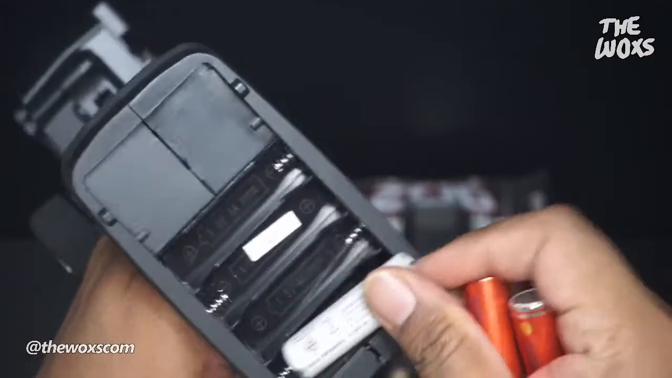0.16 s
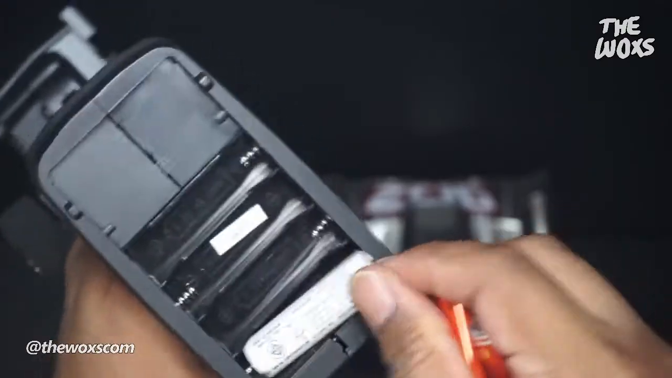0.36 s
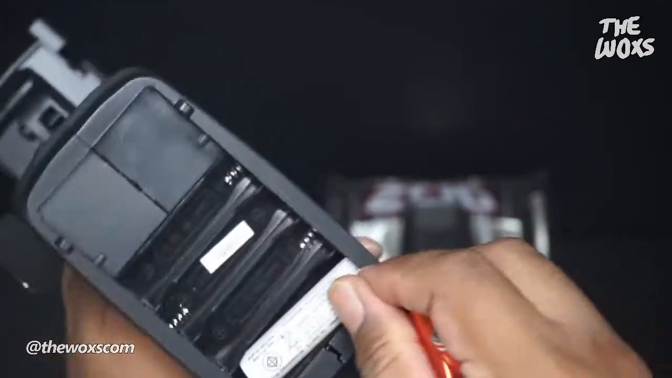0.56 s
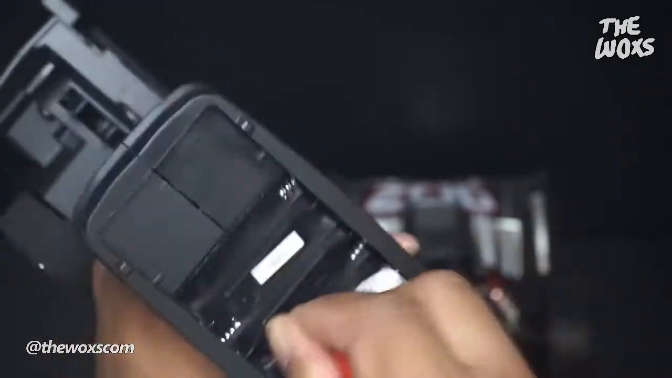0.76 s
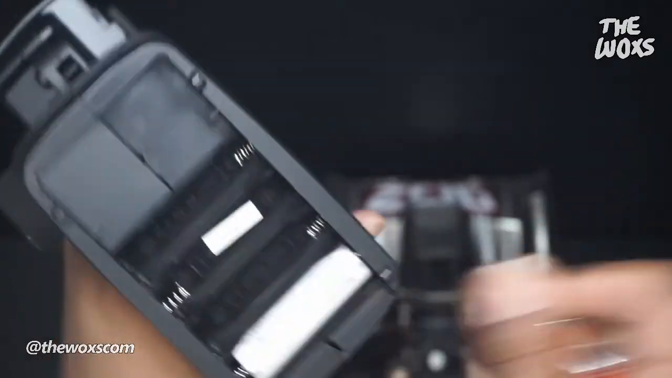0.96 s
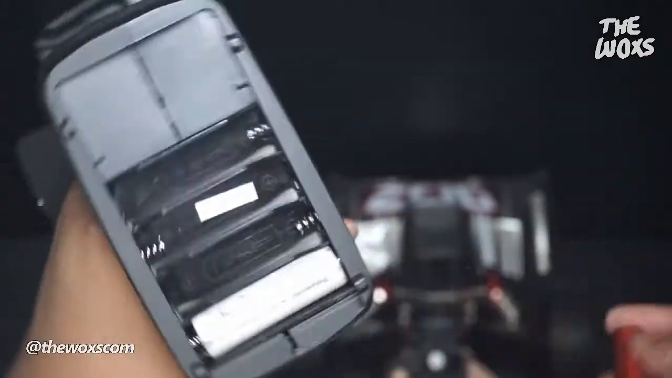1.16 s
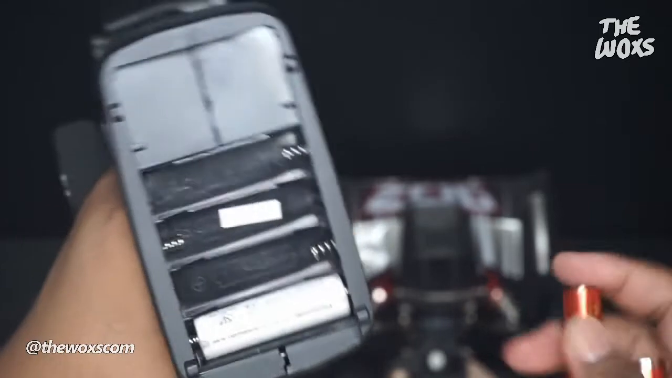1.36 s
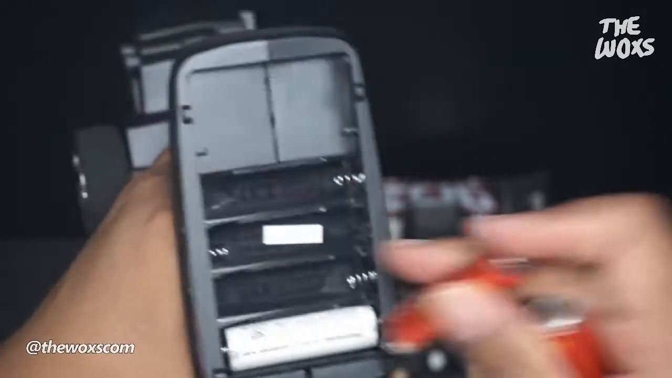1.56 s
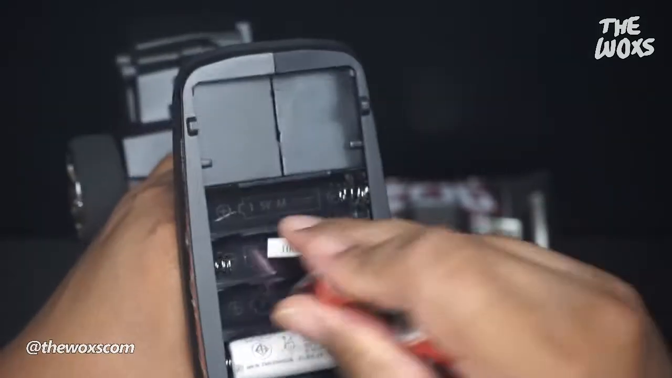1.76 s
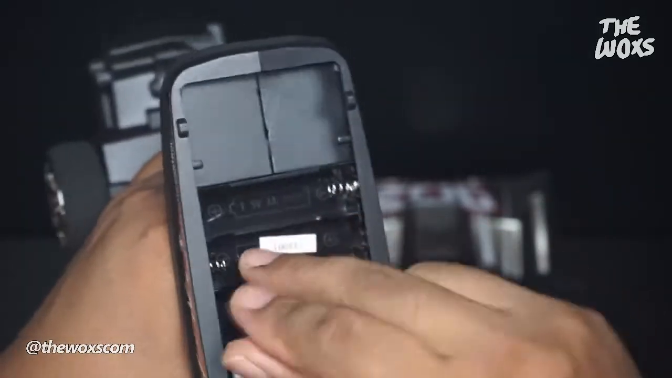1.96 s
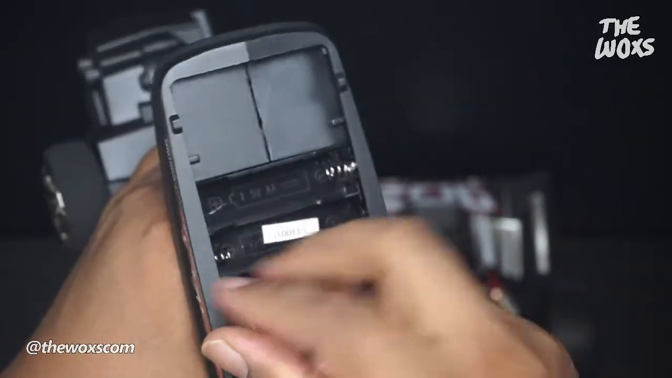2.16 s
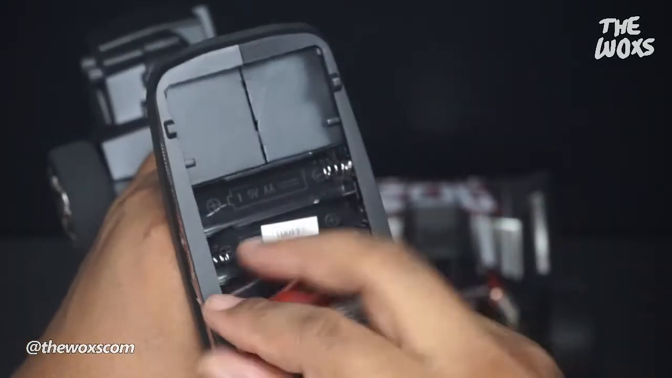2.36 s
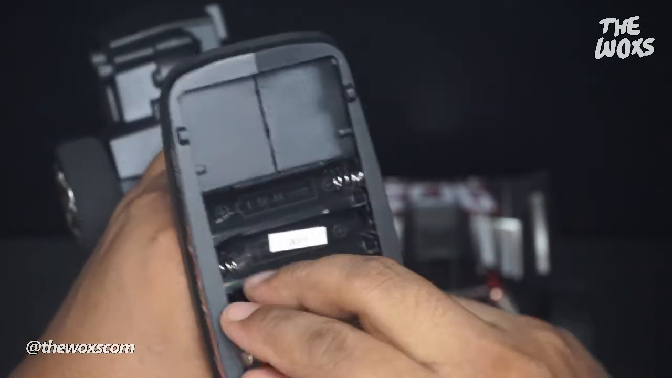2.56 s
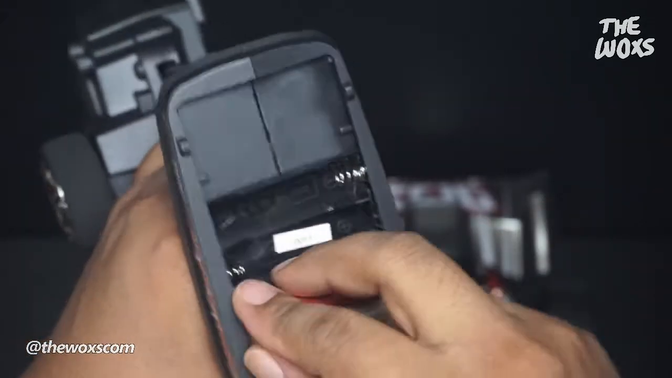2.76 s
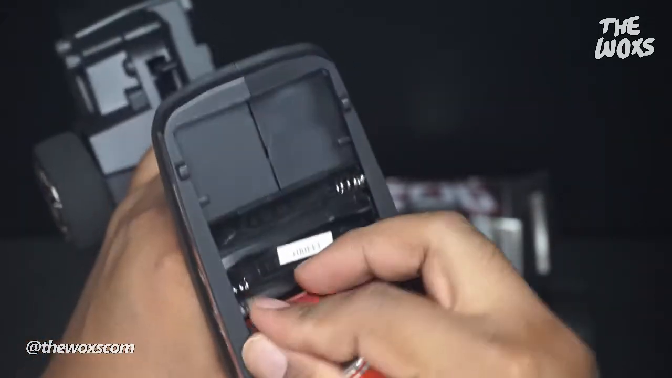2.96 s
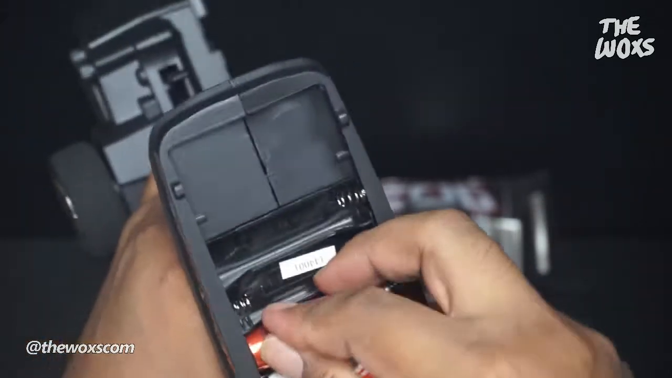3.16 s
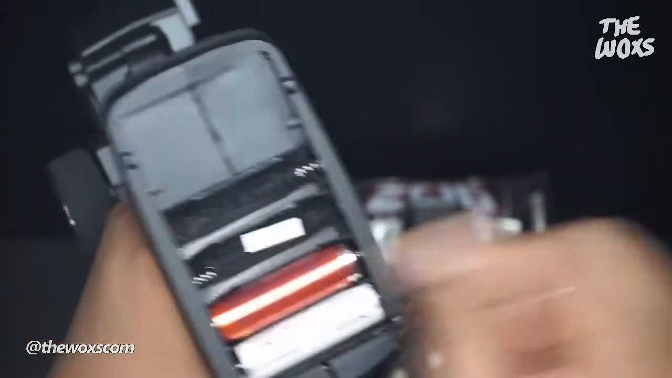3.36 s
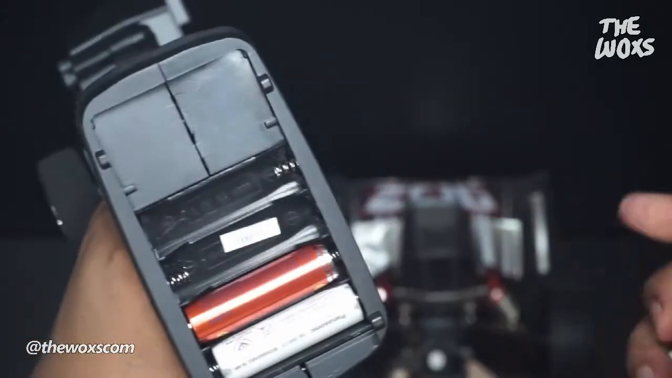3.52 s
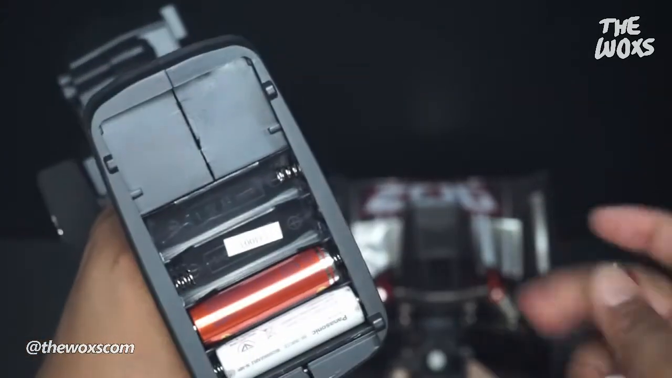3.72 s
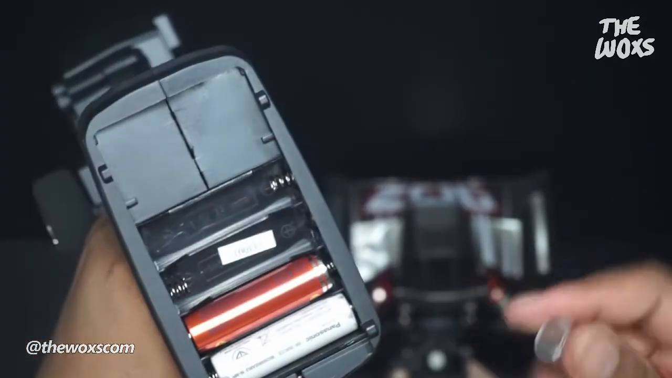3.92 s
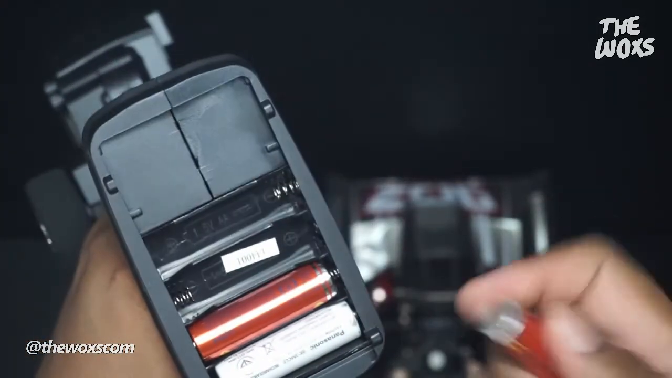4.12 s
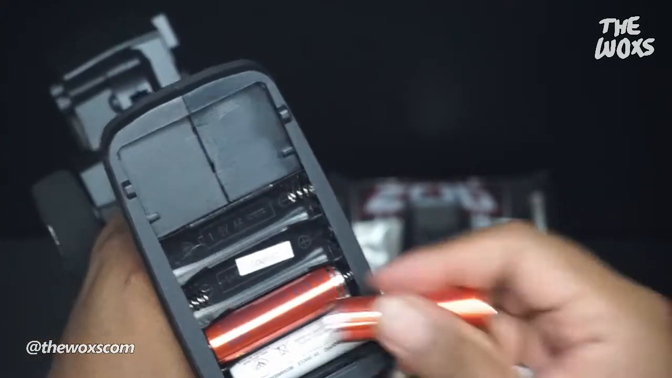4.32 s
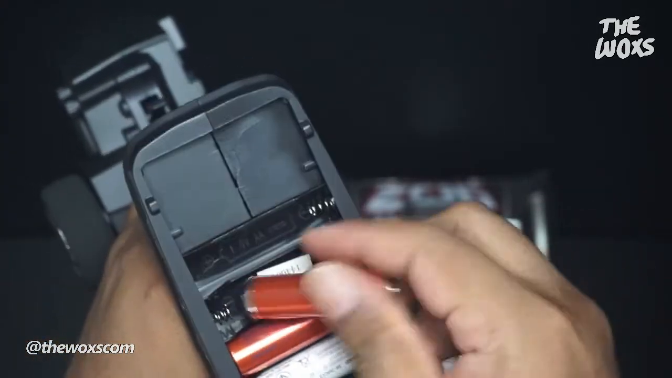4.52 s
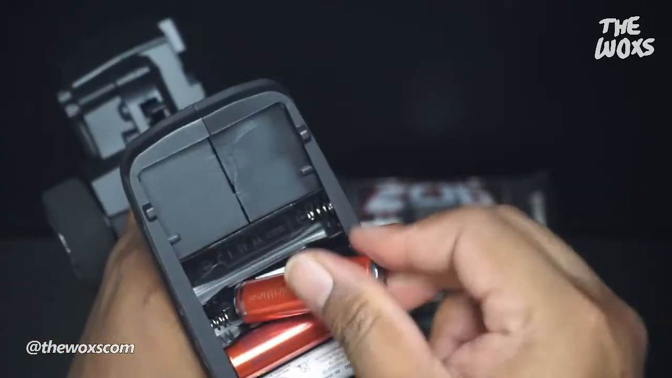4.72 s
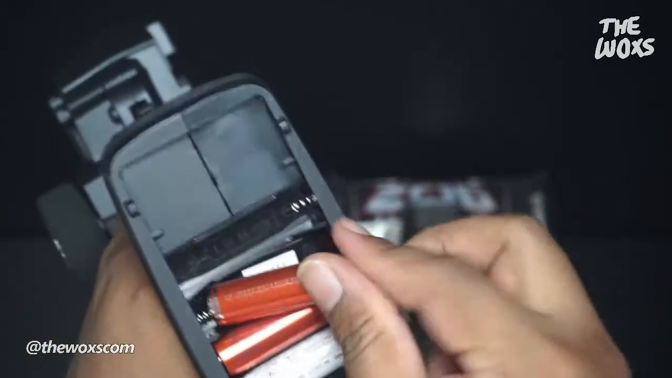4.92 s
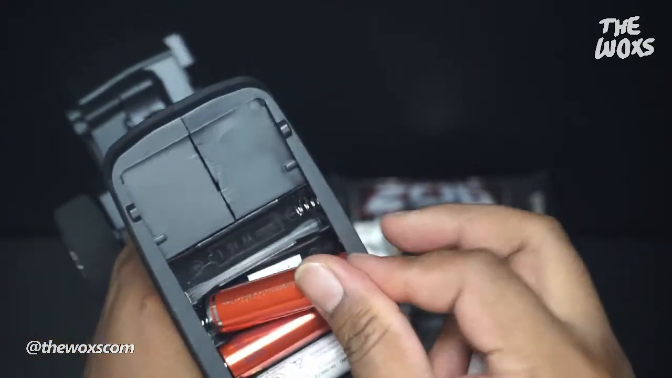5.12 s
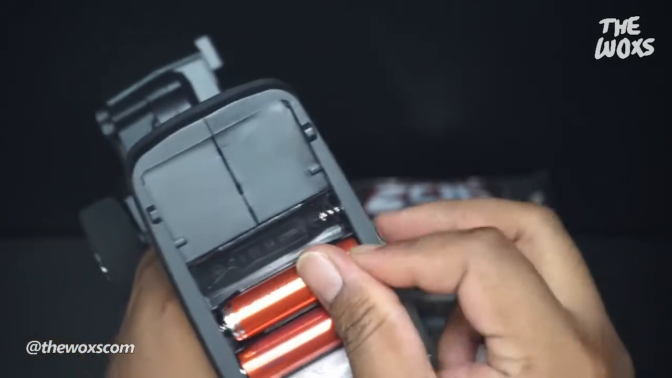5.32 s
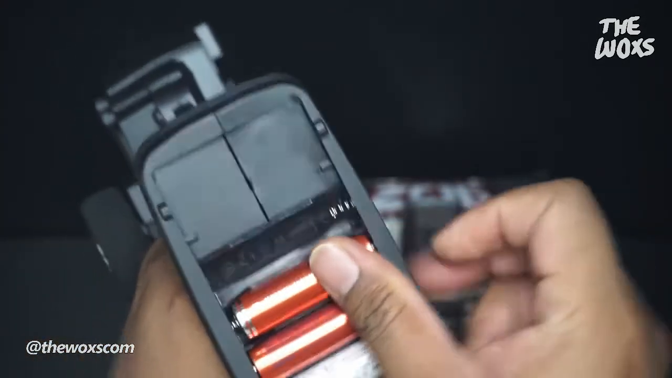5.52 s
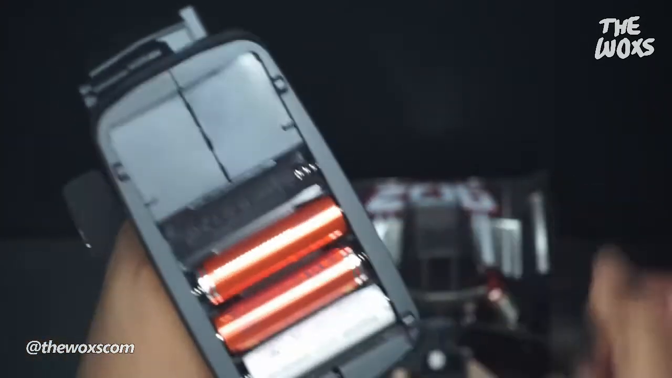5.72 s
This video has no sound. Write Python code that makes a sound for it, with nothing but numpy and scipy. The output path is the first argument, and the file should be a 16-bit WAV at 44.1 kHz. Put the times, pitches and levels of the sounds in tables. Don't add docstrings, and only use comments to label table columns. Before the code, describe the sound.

Hard battery cells tap, grind and snap into a thin plastic compartment. Irregular bursts of dry mid-high clacks come with little rattling rebounds, airy finger rubs and a thin metallic spring ring. Bursts fall early, near two and three seconds, and strongest past five, with quiet between. Recorded close and left-leaning in stereo, with short room reflections and steady low noise.

```python
import sys
import numpy as np
from scipy import signal
from scipy.fft import rfft, irfft, next_fast_len
from scipy.io import wavfile
from scipy.ndimage import uniform_filter1d

SR = 44100
rng = np.random.default_rng(int(sys.argv[2]) if len(sys.argv) > 2 else 0)


def level_to_linear(level):
    exponent = np.asarray(level, float) / 20
    return 10 ** exponent


def persist_wave(psi):
    counts = np.round(np.clip(psi, -1, 1) * 32767).astype(np.int16)
    wavfile.write(sys.argv[1], SR, np.atleast_2d(counts).T)


N = 255339


def evened(x):
    return x / np.sqrt(np.mean(x ** 2) + 1e-20)


def read(points, hz):
    f, value = np.transpose(points)
    return np.interp(np.log(hz + 1), np.log(f + 1), value)


def add(mix, s, sound):
    part = mix[round(s * SR):][:len(sound)]
    part += sound[:len(part)]


def coloured(x, points):
    length = x.shape[-1]
    size = next_fast_len(length)
    gain = level_to_linear(read(points, np.fft.rfftfreq(size, 1 / SR)))
    return irfft(rfft(x, size) * gain, size)[..., :length]


def ring(t, hz, db, t60):
    return level_to_linear(db - 60 * t / np.maximum(t60, 0.003)) * np.sin(2 * np.pi * hz * t)


def cluster(t, hz, t60, chance):
    spread = (2.77 + 0.87 * chance[:3, None]) / t60
    near = hz + np.array([[-1.0], [1.1], [2.3]]) * spread
    return ring(t, hz, 0, t60) + ring(t, near, -19.0, t60 * 1.49).sum(0)


# f/Hz, level/dB, t60/s
SHELL_MODES = [(305, -24.5, 0.029), (470, -5.5, 0.036), (555, -7.5, 0.048), (804, -7, 0.019),
               (946, 2, 0.029), (1257, -4.5, 0.06), (1350, -4, 0.049), (1450, -3, 0.048),
               (1738, -2.5, 0.028), (2170, -2, 0.024), (2460, -4.5, 0.013), (2880, -5, 0.024),
               (3116, -4, 0.015), (3620, -12, 0.043), (4090, -7, 0.015), (5460, -7, 0.0032)]
# f/Hz, level/dB per Hz
CRACK_COLOUR = [(1470, -20.5), (2500, -5), (2730, -13), (3320, -4), (3890, -13), (5290, -8.5), (7030, -16),
                (13700, -13.5), (15500, -18), (16500, -35)]


def knock(db, hz, t60, shell_db, crack_db, edge_hz=2000, rise=0.001):
    t = np.arange(SR // 8) / SR
    f, level, decay = np.transpose(SHELL_MODES)[:, :, None]
    spot = rng.standard_normal((len(f), 1))
    share = np.sign(spot) * level_to_linear(2.0 * np.tanh(spot[::-1]))
    shell = (share * ring(t, f * (1 + 0.013 * spot[::-1]), level, decay)).sum(0) / 3
    crack = coloured(rng.standard_normal(len(t)), CRACK_COLOUR)
    crack = evened(coloured(crack, [(edge_hz / 2, -12), (edge_hz, 0)]))
    crack *= level_to_linear(-60 * t / 0.012) + level_to_linear(-12.5 - 60 * t / 0.079)
    fed = level_to_linear(60 * np.minimum(t, rise) / t60)
    body = fed * cluster(t, hz, t60, rng.standard_normal(3))
    sound = body + level_to_linear(shell_db) * shell + level_to_linear(crack_db + 8.0) * crack
    return level_to_linear(db) * np.minimum(t / rise, 1) * sound


# t/s, level/dB, shell level/dB and crack level/dB against the ring
CELL_HITS = [(1.845, -12, -8, -26.5), (1.893, -26.5, -3.5, -18), (1.931, -34.5, -0.5, -21),
             (2.562, -36, -19, -25), (2.604, -36, -14, -27), (2.769, -38.5, -19, -11.5),
             (2.901, -35.5, -1.5, -35), (3.024, -23, -1.5, -12), (3.053, -7, -8.5, -19.5),
             (4.663, -34, -8, -27), (4.783, -36, 1, -20), (4.797, -21.5, -6, -21.5), (4.868, -43, 0, -12),
             (5.176, -28, -7, -10.5), (5.186, -15.5, 1, -14), (5.322, -30, -7, -30), (5.33, -30, 7, -19)]


def cell_knocks(out):
    for s, db, shell_db, crack_db in CELL_HITS:
        add(out, s, knock(db, 2180, 0.012, shell_db, crack_db))


# t/s, level/dB, ring f/Hz, shell level/dB, crack level/dB
BAY_HITS = [(0.418, -12.5, 1056, -6, -13.5), (0.646, -20, 1004, 2, -13), (0.661, -13.5, 979, -7, -8),
            (0.67, -16.5, 1926, 6, -13.5), (0.731, -38, 905, -4, -5), (1.911, -36, 1280, 5.5, -27),
            (2.107, -19.5, 1274, 1.5, -14), (2.792, -50, 1400, -14, 5), (2.807, -19, 1070, -1.5, -11.5),
            (2.844, -34.5, 1530, -6, -18), (3.007, -28.5, 1310, -1.5, -11.5), (3.021, -35, 1040, -13, -6),
            (5.101, -46, 1370, -1, -7), (5.62, -32, 1350, -5.5, -9)]


def bay_knocks(out):
    for s, db, hz, shell_db, crack_db in BAY_HITS:
        add(out, s, knock(db, hz, 0.022, shell_db, crack_db))


# t/s, level/dB, ring f/Hz, crack level/dB, rise/s
SEATINGS = [
    (1.969, -26, 2210, -28, 0.008),
    (2.0015, -17.5, 2210, -19, 0.004),
    (2.046, -12, 2237, -5.5, 0.0054),
    (2.947, -50.5, 2150, -20, 0.015),
    (3.23, -68, 2120, -14, .008),
    (4.764, -36, 2180, -14, 0.008),
    (5.3437, -3.5, 2190, -19, 0.0021),
]


def seatings(out):
    softness = 0.12
    for s, db, hz, crack_db, rise in SEATINGS:
        add(out, s, knock(db, hz, 0.011 * level_to_linear(-softness * db), -12, crack_db, rise=rise))


# t/s, level/dB, ring f/Hz, crack level/dB, cycles until silent
LIGHT_TICKS = [(0.144, -35.5, 3300, -35, 10), (0.2785, -28.5, 2300, -18, 8.2), (0.2827, -38, 1730, -10, 12),
               (0.8934, -37, 1800, -9, 23), (0.905, -45, 1500, -3, 12), (0.99, -37, 2720, -19, 7.8),
               (0.9956, -29, 2610, -26, 24), (1.1117, -40.5, 2430, -25, 12), (1.2166, -33, 3700, -30, 16),
               (2.326, -42, 2340, -25, 5.7), (2.4244, -47, 2270, -12, 9.9), (3.5048, -32, 2400, -40, 9.7),
               (4.5822, -39, 2450, -3.5, 23), (4.599, -33.5, 2300, -6.5, 17), (4.6062, -34.5, 2310, -8, 13),
               (4.6998, -47, 2550, -10, 12), (4.722, -50.5, 2560, -3, 15), (4.8, -32.5, 2170, -9, 18),
               (5.022, -58, 1790, -5, 18), (5.1377, -47, 3600, -6.5, 18), (5.2907, -27, 3400, -29, 14),
               (5.34, -8, 3170, -17.5, 8.6), (5.6136, -33, 3420, -16, 8.8)]


def ticks(out):
    for s, db, hz, crack_db, cycles in LIGHT_TICKS:
        add(out, s, knock(db, hz, cycles / hz, -17.5, crack_db, edge_hz=7500))


# t/s, level/dB, f/Hz
WALLS = [(0.278, -37, 1060), (0.421, -55, 470), (0.6626, -20.5, 470), (0.6718, -36, 374),
         (1.8475, -12.5, 318), (1.8485, -24.5, 573), (1.997, -14.5, 258), (2.1084, -35, 950),
         (2.1087, -28, 390), (2.8086, -37, 540), (3.0555, -23.5, 897), (3.056, -31, 522),
         (4.5833, -36.5, 482), (5.1863, -20.5, 1090), (5.1885, -22.5, 596), (5.3455, -20.5, 586)]
# t/s, level/dB, f/Hz
CELL_RIBS = [(0.6618, -14, 3095), (0.6863, -26, 1350), (.8925, -38, 2800), (1.8461, -15.5, 2960),
             (1.8463, -32, 1820), (2.0468, -31, 1350), (2.05, -17, 3520), (2.1085, -19.5, 1905),
             (2.565, -45, 1350), (2.603, -46, 1260), (2.821, -35, 2800), (3.054, -18.5, 2790),
             (4.8, -30, 1360), (5.1858, -14.5, 3530), (5.622, -33, 1660), (5.3542, -17.5, 1425),
             (5.3616, -19, 1535), (5.362, -27, 2260), (5.3767, -35, 1350), (5.379, -23, 2235),
             (.646, -22, 3460), (.646, -22, 2050), (1.975, -37, 1020), (5.197, -24.5, 1257),
             (5.329, -24.5, 1100), (5.3375, -19.5, 3620)]
# f/Hz, t60/s
WALL_DECAY = [(300, 0.0058), (500, 0.036), (1000, 0.035), (1350, 0.048), (1800, 0.0142), (2300, 0.034),
              (3000, 0.013)]


def walls_and_ribs(out):
    t = np.arange(SR // 8 + 32) / SR
    for s, db, hz in [*WALLS, *CELL_RIBS]:
        thump = cluster(t, hz, read(WALL_DECAY, hz), rng.standard_normal(3))
        add(out, s, level_to_linear(db) * thump * (1 - np.exp(-t * hz)))


def knocks():
    out = np.zeros(N)
    for strike in (cell_knocks, bay_knocks, seatings, ticks, walls_and_ribs):
        strike(out)
    return coloured(out, [(60, -26.0), (200, -3.5), (400, -4.5)])


# t/s, level/dB, f/Hz, t60/s
SINGERS = [(.419, -20, 952, 0.022), (0.4189, -12, 1110, 0.0025), (0.418, -49.5, 1771, 0.37),
           (0.418, -52, 1343, 0.33), (.42, -45, 466, 0.14), (0.671, -18, 1500, 0.0035),
           (.672, -42, 1810, 0.26), (0.689, -46, 1323, 0.18), (.707, -44, 3160, 0.14),
           (.99, -45.5, 3480, 0.049), (1.2162, -56, 2400, .012), (0.99, -42, 2590, 0.076),
           (1.847, -34, 1740, 0.064), (1.851, -49, 1340, 0.23), (2.003, -33, 2480, 0.099),
           (2.0038, -28, 1380, 0.032), (2.05, -29, 1790, 0.059), (2.05, -49, 2320, 0.06),
           (2.05, -38, 2450, 0.068), (2.05, -45, 1280, .25), (2.108, -21.5, 1000, .014),
           (2.565, -57, 3860, .05), (3.056, -38, 2100, 0.25), (3.056, -44, 491, 0.14),
           (5.186, -14.5, 3040, 0.0039), (5.2885, -46, 2200, 0.027), (5.347, -39, 1342, 0.24),
           (5.347, -44, 1483, 0.42), (5.346, -39.5, 1629, 0.37), (5.347, -40, 2147, .29),
           (5.347, -39, 2210, 0.12), (5.348, -39.5, 2460, 0.36), (.895, -51, 10000, 0.042),
           (.895, -55, 11600, .04), (.904, -52, 14300, .03), (4.721, -47, 11200, .02),
           (4.802, -45, 9000, .025), (5.025, -54, 9800, 0.055), (5.55, -58, 12400, .15),
           (5.623, -36.5, 11150, 0.033), (5.62, -44, 12300, 0.055), (3.16, -51, 2106, .12),
           (1.2172, -37, 4100, 0.0066), (1.226, -46.5, 3200, .06)]
# t/s, level/dB, f/Hz, t60/s
EDGE_PINGS = [(.4185, -19, 1620, 0.015), (.4185, -24, 2650, 0.016), (.4185, -32, 5250, 0.007),
              (.4075, -34.5, 900, .012), (0.45, -33, 1960, .015), (.7315, -40, 4280, 0.027),
              (1.9765, -31, 2800, .005), (1.996, -27.5, 3000, .012), (2.098, -42, 5400, .02),
              (2.144, -42, 1140, .01), (2.882, -42, 2100, .008), (2.7915, -40, 1400, 0.034),
              (5.1764, -23, 2460, .009), (6.3, -42, 1900, .02), (5.8, -35, 2500, .02),
              (5.3405, -18, 5640, .005), (.6625, -28, 5300, .008), (0.2785, -42, 3000, .008),
              (4.7825, -38, 2200, .015), (4.7898, -33, 2250, .012), (4.6005, -48, 4350, .04),
              (5.582, -56, 6400, .03), (.6622, -20, 3230, .018), (.6708, -22, 3150, .014),
              (.42, -30, 330, .03), (.2788, -44, 4700, .008), (1.2168, -36, 3150, .014),
              (.1445, -46, 2850, .01), (4.701, -48, 2550, .015), (4.667, -50, 1330, .12),
              (5.63, -44, 1600, .12), (.8935, -50, 6600, .03), (.894, -48, 3750, .02),
              (2.606, -50, 2050, .04), (5.3615, -28, 2200, .03)]


def singing():
    out, t = np.zeros(N), np.arange(SR // 2) / SR
    for s, db, hz, t60 in [*SINGERS, *EDGE_PINGS]:
        add(out, s, ring(t, hz, db, t60) * (1 - np.exp(-t * hz)))
    return out


# t/s, level/dB, t60/s, swell/s, silent after/s
SPRING_RINGS = [
    (.42, -50.5, 3.3, 0.028, 0.51),
    (.7, -42, 1, 0.03, 0.093),
    (.765, -42, 1.5, 0.015, 0.3),
    (1.045, -62, 1.1, 0.015, 0.1),
    (3.053, -52, 1.6, 0.026, .42),
]


def springs():
    out, t = np.zeros(N), np.arange(SR) / SR
    for s, db, t60, swell, silent in SPRING_RINGS:
        beat = np.cos(np.pi / 2 * np.minimum(t / silent, 1))
        add(out, s, ring(t, 917.8, db, t60) * (1 - np.exp(-t / swell)) * beat)
    return out


def stroke(out, metal, shell, edge_hz, row):
    s, half, fizz_db, scrape_db, hz = row
    at = slice(round((s - half) * SR), round((s + half) * SR))
    fizz = evened(coloured(metal[at], [(edge_hz / 4, -30), (edge_hz * 0.5, -18), (edge_hz, 0)]))
    resonance = [(hz / 4, -25), (hz * 0.923, -10.5), (hz, 0), (hz * 1.06, -10.5), (hz * 3, -22)]
    scrape = evened(coloured(shell[at], resonance))
    out[at] += np.hanning(len(fizz)) * (level_to_linear(fizz_db) * fizz + level_to_linear(scrape_db) * scrape)


# centre t/s, half length/s, fizz level/dB, scrape level/dB, resonance f/Hz
FINGER_SLIDES = [(0.917, 0.026, -61, -54, 1430), (1.005, 0.022, -70, -52, 2650),
                 (1.12, 0.01, -82, -61, 2380), (1.255, 0.035, -82, -62, 3500),
                 (2.336, 0.027, -70, -57, 2210), (2.428, 0.056, -74, -63, 2120),
                 (1.033, 0.026, -72, -65, 2600), (1.235, 0.027, -74, -60, 3000),
                 (2.518, 0.049, -56.5, -66, 3000), (3.18, 0.026, -61, -56.5, 2057),
                 (3.233, 0.017, -61, -57.5, 2070), (3.306, 0.062, -64, -70, 1980),
                 (3.652, 0.14, -71, -77, 2030), (4.617, 0.033, -59, -62, 2500),
                 (4.63, .022, -80, -61, 3120), (4.609, 0.01, -84, -61, 4300),
                 (5.154, 0.011, -80, -69, 3550), (4.668, .01, -80, -53, 2210),
                 (4.79, 0.035, -59, -49, 2160), (4.87, 0.11, -63.5, -61.5, 2100),
                 (4.971, 0.032, -57, -64, 1990), (5.019, 0.028, -60, -76, 2000),
                 (5.156, 0.027, -66, -57, 2430), (5.402, 0.092, -82, -48.5, 2330),
                 (5.454, 0.017, -54.5, -53, 1490), (5.514, 0.047, -76, -68, 2370),
                 (5.58, 0.055, -57, -61.5, 3800), (5.622, 0.024, -44, -45, 3350),
                 (5.649, 0.028, -61, -56, 1590), (0.73, 0.016, -43, -44, 4280),
                 (2.05, 0.0054, -37, -35.5, 1740), (2.808, 0.0075, -48, -44, 3620),
                 (5.183, 0.0068, -40.5, -39, 2700)]


def slides(out, metal, shell):
    for row in FINGER_SLIDES:
        stroke(out, metal, shell, 9400, row)


# centre t/s, half length/s, fizz level/dB, scrape level/dB, resonance f/Hz
CELL_GRINDS = [(0.12, 0.05, -67, -63, 1630), (0.268, 0.13, -58, -59, 2600), (0.415, 0.015, -45, -40, 1780),
               (0.412, 0.01, -70, -50, 3220), (0.691, 0.063, -45, -39.5, 1350),
               (1.896, 0.052, -64, -54, 1490), (1.981, 0.023, -59, -54, 2200),
               (2.002, 0.012, -55, -37.5, 1980), (2.091, 0.068, -55, -48, 1450),
               (2.563, 0.026, -59, -58.5, 3700), (2.611, 0.033, -68, -57.5, 3640),
               (2.805, 0.028, -46.5, -50, 1400), (2.848, 0.03, -58, -54, 2890),
               (3.053, 0.064, -48, -41.5, 1990), (5.18, 0.0087, -48, -58, 3500),
               (5.291, 0.014, -53.5, -50, 3100), (5.34, 0.017, -55, -41, 1190),
               (5.382, 0.08, -46.5, -47.5, 1535), (2.012, 0.027, -57, -44, 1490),
               (5.375, 0.063, -69, -47, 764), (1.88, .039, -69, -56, 3000), (3.104, 0.023, -60, -58, 2730),
               (4.596, 0.025, -78, -55.5, 1390), (4.84, 0.036, -66, -59, 1350), (5.22, 0.03, -57, -51, 850)]


def grinds(out, metal, shell):
    for row in CELL_GRINDS:
        stroke(out, metal, shell, 4500, row)


# start t/s, level/dB, centre f/Hz, t60/s
REBOUNDS = [(0.422, -42, 3500, 0.15), (.674, -40.5, 3500, 0.24), (2.01, -48, 2000, 0.14),
            (2.056, -42, 3000, 0.16), (2.112, -44, 1300, .17), (2.812, -45.5, 1300, 0.22),
            (2.838, -56, 3300, 0.099), (3.057, -43.5, 2600, 0.19), (5.19, -42.5, 2800, 0.15),
            (5.35, -40, 2300, 0.29), (5.607, -50, 4000, .3)]


def chatter(out, grains, body):
    strong = grains * (abs(grains) > 3.0)
    t = np.arange(len(body)) / SR
    rebounds = signal.oaconvolve(strong, body * level_to_linear(-60 * t / 0.01))
    for s, db, hz, t60 in REBOUNDS:
        taps = rebounds[round(s * SR):][:SR // 4]
        taps = evened(coloured(taps, [(hz / 3, -16), (hz, 0), (hz * 2.5, -6)]))
        add(out, s, taps * level_to_linear(db - 60 * np.arange(len(taps)) / SR / t60))


# f/Hz, level/dB
METAL_COLOUR = [(6000, 2.5), (6500, 10.5), (7500, 2.5), (9800, -1), (10800, -0.5), (12300, 3), (13300, 3.5),
                (14500, 1.5), (16500, -4)]


def rubs():
    out, t = np.zeros(N), np.arange(SR // 16) / SR
    size = level_to_linear(2.0 * np.minimum(rng.exponential(1, (2, N)), 5))
    grains = rng.standard_normal((2, N)) * size * (rng.random((2, N)) < 0.3)
    body = np.zeros(len(t))
    for k, (hz, db, t60) in enumerate(SHELL_MODES):
        body += (-1) ** k * ring(t, hz, db + 6.4 * np.log2(hz / 1000), t60 * 0.39)
    shell = signal.oaconvolve(grains[0], body)[:N]
    metal = coloured(grains[1], METAL_COLOUR)
    slides(out, metal, shell)
    grinds(out, metal, shell)
    chatter(out, grains[1], body)
    return out


# f/Hz, t60/s
ROOM_DECAY = [(300, 0.31), (800, 0.29), (2100, 0.26), (5500, 0.4), (14600, 0.45)]
# t/s, level/dB
EARLY_ECHOES = [(.0045, -13.5), (.009, -20), (0.015, -20.5), (.023, -23), (.033, -23.5)]
# f/Hz, likeness
TAIL_LIKENESS = [(300, 0.51), (1000, 0.46), (3000, 0.27), (8000, 0.16)]


def room(x):
    size, count = SR // 2, 3
    taps = np.zeros((count, 2, size))
    at = np.arange(400, size - 20, 20) + rng.integers(0, 20, (count, 2, (size - 401) // 20))
    np.put_along_axis(taps, at, rng.choice([-1., 1.], at.shape), 2)
    hz, t, z = signal.stft(taps, SR, nperseg=256)
    same = np.clip(read(TAIL_LIKENESS, hz), -1, 1)[:, None]
    z[:, 1] = same * z[:, 0] + np.sqrt(1 - same ** 2) * z[:, 1]
    decay = level_to_linear(-60 * t / read(ROOM_DECAY, hz)[:, None])
    tail = signal.istft(z * decay, SR, nperseg=256)[1]
    tail = level_to_linear([[-6.0], [-8.5]]) * tail / np.linalg.norm(tail[0, 0])
    for s, db in EARLY_ECHOES:
        shift, sign = rng.uniform(-1.87, 1, 2)
        ears = [round(s * SR), round(s * SR + 6 * shift)]
        tail[:, [0, 1], ears] += level_to_linear(db) * np.sign(sign)
    tail = coloured(tail, [(300, 3.5), (900, 6.5), (2000, 5.5), (3300, 1.5), (6000, 0.5), (15000, 0.5)])
    turn = 2 * np.pi * (np.arange(N) * 3 / SR + np.arange(count)[:, None] / count)
    share = (1 + np.cos(turn)) / count
    return signal.fftconvolve((x * share)[:, None], tail, axes=2)[:, :, :N].sum(0)


# f/Hz, level/dB per Hz
HISS_COLOUR = [(12, -31), (20, -2.5), (114, -4.5), (156, -3.5), (184, -8.5), (230, -4.5), (342, -8),
               (634, -12), (863, -14), (1110, -14.5), (1840, -17.8), (15200, -24.5), (16500, -24)]
# f/Hz, likeness
HISS_LIKENESS = [(60, 1), (130, 0.56), (290, -0.17), (640, -0.41), (1410, -0.59), (3100, -0.21),
                 (6820, 0.02), (15000, -0.04)]


def hiss():
    frames, hz = N // 256 + 5, np.fft.rfftfreq(1024, 1 / SR)
    a, b, c, d, patches = rng.standard_normal((frames, 513, 5)).T
    patches = uniform_filter1d(uniform_filter1d(patches, 20, 0), 20, 1)
    same = np.clip(read(HISS_LIKENESS, hz), -1, 1)[:, None]
    left = a + 1j * b
    right = same * left + np.sqrt(1 - same ** 2) * (c + 1j * d)
    z = np.array([left, right])
    z /= np.sqrt((1 + np.clip(same, -0.8, 1)) / 2)
    z *= level_to_linear(read(HISS_COLOUR, hz)[:, None] + 0.5 * evened(patches))
    both = signal.istft(z, nperseg=1024, noverlap=768)[1][:, :N]
    return level_to_linear(-61.5) * both / np.std(both.mean(0))


# f/Hz, phase/rad
PORT_PHASE = [(0, 0.5), (600, -0.82), (3010, -0.62), (6980, -1.36), (8010, -1.1), (13400, -0.52),
              (15800, -0.1), (16400, -0.61)]


def turned(x, share):
    hz = np.fft.rfftfreq(len(x), 1 / SR)
    return irfft(rfft(x) * np.exp(1j * share * read(PORT_PHASE, hz)), len(x))


# f/Hz, left minus right level/dB
SIDE_LEVEL = [(60, 2), (180, 0), (550, 2.5), (1650, 4.5), (4970, 6), (15000, 14)]


def scene():
    remote = level_to_linear(-0.84) * knocks() + rubs() + singing()
    near = remote + springs()
    walls = room(remote)
    left = coloured(near, [(hz, db / 2) for hz, db in SIDE_LEVEL]) + walls[0]
    right = coloured(near, [(hz, -db / 2) for hz, db in SIDE_LEVEL]) + walls[1]
    return np.array([turned(left, 0.45), turned(right, -0.57)]) + hiss()


def band_limit(x):
    return signal.sosfilt(signal.butter(12, 16650, fs=SR, output="sos"), x)


def record(dry):
    limited = coloured(dry, [(15700, 0), (15900, -20), (16500, -26), (16700, -70)])
    return band_limit(limited)


dry = scene()
out = record(dry)
persist_wave(out)
```